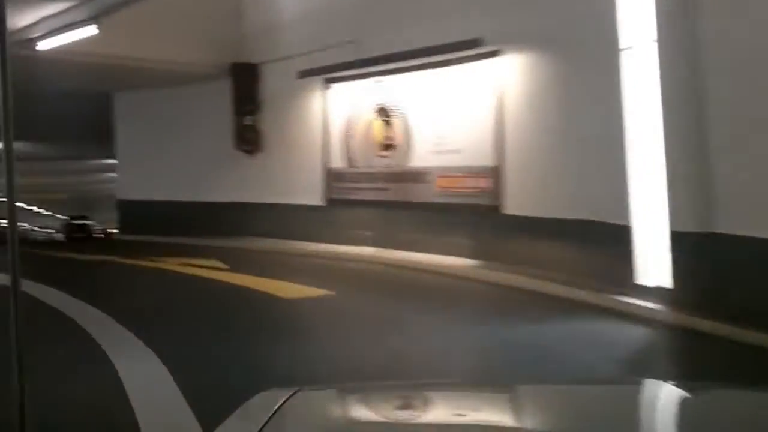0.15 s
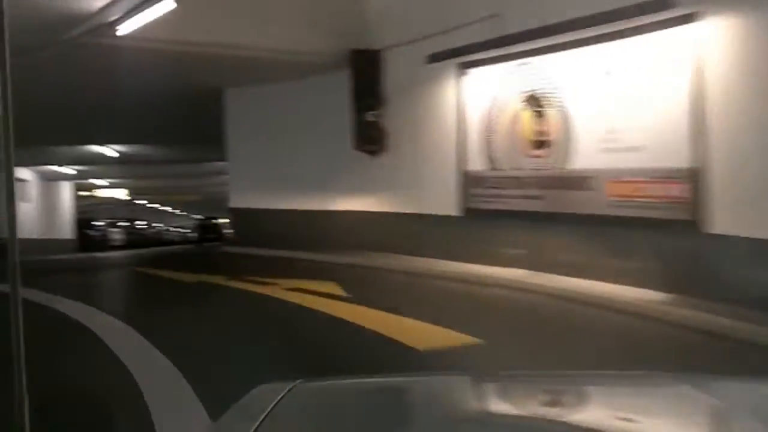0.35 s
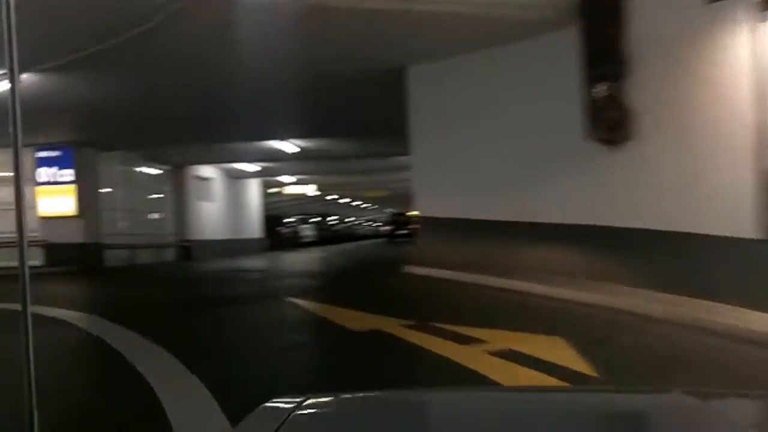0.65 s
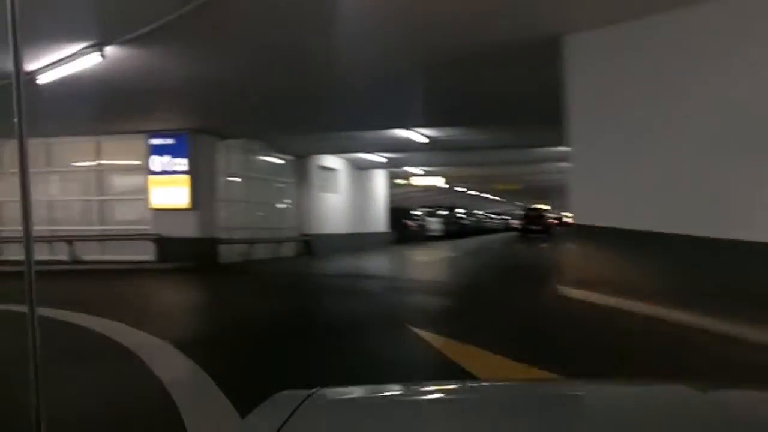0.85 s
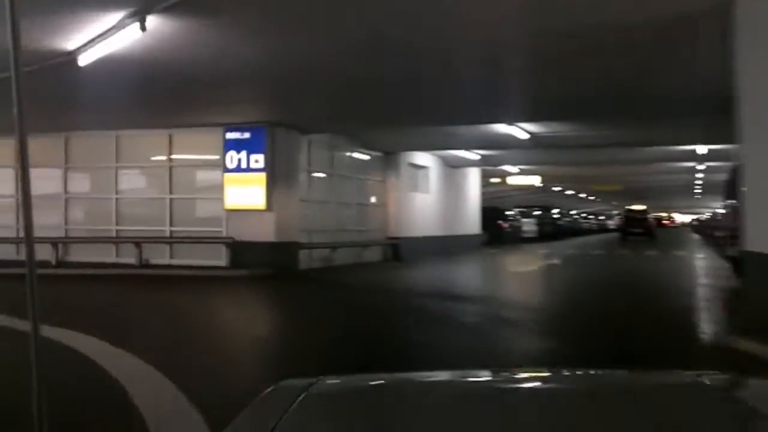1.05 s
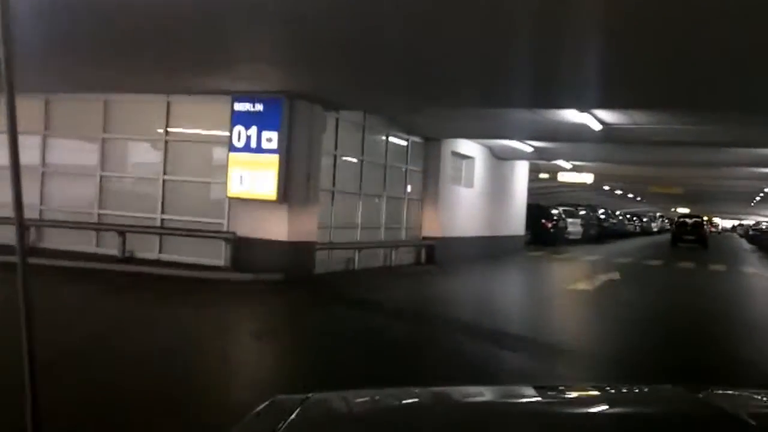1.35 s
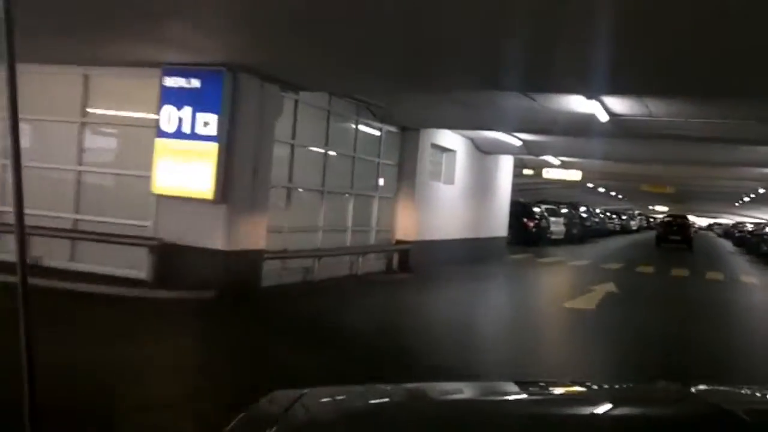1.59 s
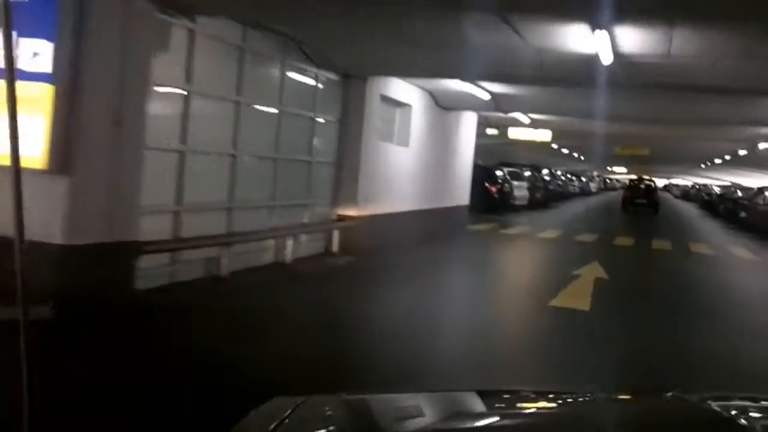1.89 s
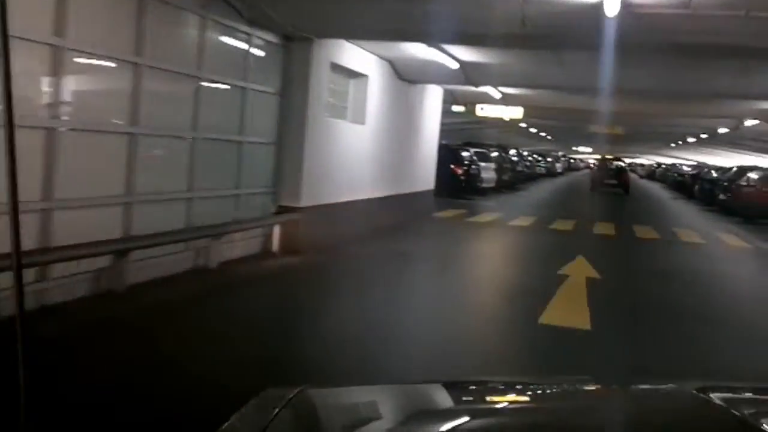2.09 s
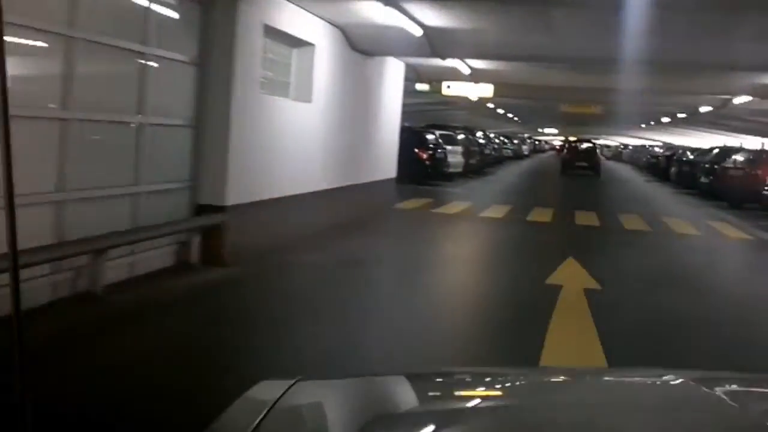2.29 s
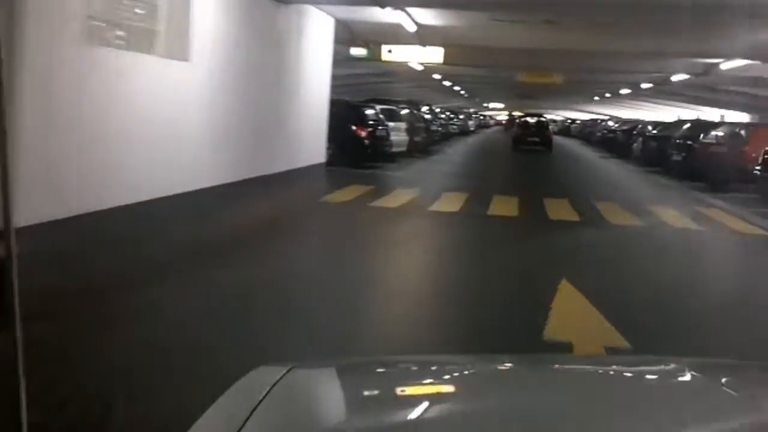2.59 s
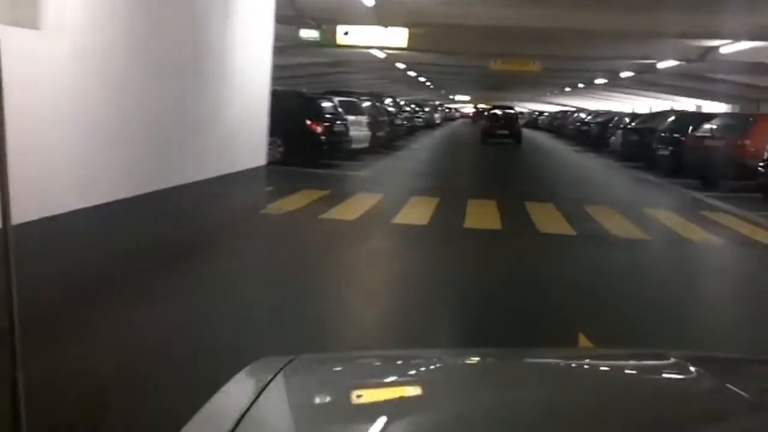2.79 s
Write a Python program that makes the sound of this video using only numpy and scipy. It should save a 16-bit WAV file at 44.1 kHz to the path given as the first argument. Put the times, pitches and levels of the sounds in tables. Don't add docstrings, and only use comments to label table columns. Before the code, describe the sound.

Car tyres squeal in a wavering, high-pitched chatter while turning in a concrete garage; the squeal echoes away and leaves engine hum and thumping rolling rumble, heard from a small camera on board.

```python
import sys
import numpy as np
from scipy import signal
from scipy.fft import rfft, irfft
from scipy.io import wavfile
from scipy.ndimage import uniform_filter1d

SR = 44100
rng = np.random.default_rng(int(sys.argv[2]) if len(sys.argv) > 2 else 0)


def invert_db(x):
    u = np.asarray(x, float) / 20
    return 10 ** u


def pcm_store(signal):
    levels = np.round(np.clip(np.atleast_2d(signal), -1, 1) * 32767)
    wavfile.write(sys.argv[1], SR, levels.astype(np.int16).T)


N = 129654
TIME = np.arange(N) / SR

# [multiple, level/dB]
SLIP_HARMONICS = [(1, 3), (2, -14), (3, -25.5), (4, -42.5)]
# [t/s, roar/dB, body boom/dB, cabin boom/dB, deep roar/dB]
ROLLING = [(0, -43.5, -19.5, -52, -14.5), (.3, -41.5, -30, -50.5, 2.5), (.45, -45, -25, -50.5, -3),
           (.56, -44, -31.5, -30, 2.5), (.75, -46.5, -24.5, -40.5, -0.5), (.95, -43, -26.5, -42.5, -8),
           (1.1, -39, -28, -32.5, 1.5), (1.25, -40.5, -29, -26.5, 2), (1.4, -40.5, -25, -28, 0.5),
           (1.7, -48, -31.5, -26.5, 2), (1.9, -39.5, -51, -19.5, 3.5), (2.1, -44.5, -24.5, -30, 0),
           (2.3, -39.5, -33, -26.5, 3.5), (2.45, -35, -23.5, -31, 2), (2.6, -42, -26, -31.5, -9.5),
           (2.75, -35.5, -25, -50, 5.5), (2.86, -32.5, -27, -47, -6.5), (2.94, -38.5, -25.5, -45, -2.5)]
# [t/s, overload of the gain control/dB, push of the body/-1..1]
BODY_JOLTS = [(.01, 8.5, -0.15), (0.157, 6, -0.14), (0.207, 7, 0.13), (0.353, 7.5, -0.18),
              (0.446, 6.5, 0.19), (0.584, 4, -0.048), (0.639, 5, -0.13), (0.727, -1.5, -0.075),
              (0.804, 5, -0.12), (0.869, 8.5, -0.15), (1.031, 4.5, -0.092), (1.107, 7, -0.13),
              (1.203, 5, 0.023), (1.33, 8.5, 0.25), (1.36, 10.5, -0.22), (1.49, 2, 0.025),
              (1.566, 4, -0.088), (1.679, 8, -0.082), (1.814, 6.5, 0.17), (1.859, 10, 0.074),
              (1.981, 7.5, -0.26), (2.375, 12, -0.25), (2.481, 8, 0.17), (2.54, 7.5, 0.17),
              (2.698, 5.5, -0.097), (2.75, 8, 0.14), (2.892, 2.5, -.08)]


def read(points, hz):
    f, value = np.transpose(points)
    return np.interp(np.log(hz + 1), np.log(f + 1), value)


def curve(table):
    rows = np.transpose(table)
    return [np.interp(TIME, rows[0], r) for r in rows[1:]]


def evened(x):
    return x / np.sqrt(np.mean(x ** 2) + 1e-20)


def tinted(x, gain):
    hz = np.fft.rfftfreq(x.shape[-1], 1 / SR)
    return irfft(rfft(x) * gain(hz), x.shape[-1])


def noise(gain):
    return evened(tinted(rng.standard_normal(N), gain))


def drift(hz, count=1):
    return evened(tinted(rng.standard_normal((count, N)), lambda f: 1 / (1 + (f / hz) ** 4)))


def phase(hz):
    return 2 * np.pi * np.cumsum(hz, axis=-1) / SR


def ducking_db():
    recover_db_per_s = 90.5
    jolts = np.array(BODY_JOLTS)
    since = TIME - jolts[:, :1]
    over = np.where(since > 0, jolts[:, 1:2] - recover_db_per_s * since, 0)
    return uniform_filter1d(np.maximum(over.max(axis=0), 0), size=180)


def squeal():
    # [t/s, level/dB, slip pitch f/Hz, spread of the ribs/ratio, scuff/dB]
    scrub = [(.03, -35, 1635, 0.31, -50), (.13, -29.5, 1592, 1.35, -57.5), (.28, -27.5, 1583, 1.276, -48.5),
             (.42, -32, 1597, 0.98, -57), (.56, -26.5, 1631, 0.85, -55), (.68, -30.5, 1597, 0.73, -59.5),
             (.84, -35, 1612, 0.94, -54), (.88, -24.5, 1609, 0.86, -46), (.97, -30.5, 1688, .8, -57.5),
             (1.08, -30, 1609, 1.64, -47), (1.16, -33.5, 1608, 1.33, -61.5), (1.3, -39, 1590, 0.98, -55.5),
             (1.4, -40, 1570, 1, -67.5), (1.5, -42, 1570, 1.12, -59.5), (1.65, -51.5, 1585, 0.97, -83),
             (1.81, -47.5, 1567, 1.074, -58.5), (2.1, -64, 1542, 1.26, -69), (2.5, -81, 1536, 1.284, -70)]
    rib_db = [
        [-11],
        [-3],
        [0],
        [0],
        [-3],
        [-11],
    ]
    # [f/Hz, density/dB per Hz]
    scuff_colour = [(1250, -16.5), (1600, 8), (1950, 3), (2300, -15.5), (3000, 3), (3750, -4.5), (4150, -8),
                    (8000, -14)]
    level_db, hz, spread, scuff_db = curve(scrub)
    offset = 0.025 * spread * (np.arange(6)[:, None] - 5 / 2)
    wander = 0.017 * tinted(drift(55, count=6), lambda f: f > 8)
    turns = phase(hz * (1 + offset + wander))
    grip_db = 4 * tinted(drift(45, count=6), lambda f: f > 5)
    grip = invert_db(grip_db + rib_db)
    ribs = np.zeros(N)
    for k, db in SLIP_HARMONICS:
        edge_db = 5.5 * (k > 1)
        ribs += invert_db(db + edge_db) * (grip * np.cos(k * turns)).sum(axis=0)
    grit = noise(lambda f: invert_db(read(scuff_colour, f)) * (f > 900))
    near = bites() + invert_db(level_db - 7) * evened(ribs)
    near = near + invert_db(scuff_db + 8 + 3 * drift(50)[0]) * grit
    return garage(near)


def bites():
    # [t/s, peak level/dB, f/Hz, length/s]
    rib_bites = [(0.0292, -35, 1387, 0.017), (0.0303, -25, 1598, 0.013), (0.055, -35.5, 1653, 0.015),
                 (0.1084, -26.5, 1645, 0.013), (0.1357, -21.5, 1557, 0.016), (0.2217, -28, 1558, 0.014),
                 (0.2364, -18.5, 1572, 0.011), (0.266, -18, 1609, 0.013), (0.3113, -18.5, 1590, 0.014),
                 (0.3661, -28.5, 1507, 0.011), (0.3994, -24.5, 1595, 0.011), (0.41, -27.5, 1653, 0.016),
                 (0.4325, -28, 1598, 0.011), (0.463, -31, 1685, 0.012), (0.5215, -23, 1554, 0.013),
                 (0.5312, -20, 1660, 0.011), (0.615, -22.5, 1647, 0.013), (0.6297, -20, 1575, 0.017),
                 (0.6677, -21, 1610, 0.011), (0.681, -17.5, 1561, 0.012), (0.7458, -26, 1627, 0.015),
                 (0.78, -18, 1587, 0.013), (0.854, -22.5, 1660, 0.015), (0.8833, -22, 1742, 0.016),
                 (0.902, -23, 1627, 0.011), (0.945, -23, 1667, 0.011), (0.9577, -20, 1669, 0.015),
                 (0.9914, -29, 1643, 0.013), (1.0265, -27.5, 1645, 0.016), (1.062, -25.5, 1660, 0.013),
                 (1.093, -21, 1674, 0.013), (1.1285, -24, 1511, 0.017), (1.1484, -25, 1620, 0.015),
                 (1.1802, -25, 1640, 0.014), (1.2787, -31, 1568, 0.021), (1.296, -26, 1592, 0.015)]
    out = np.zeros(N)
    for s, peak_db, hz, length in rib_bites:
        t = np.arange(round(max(length, .004) * SR)) / SR
        swell = np.sin(np.pi * (t / t[-1]) ** 0.46)
        tone = sum(invert_db(db) * np.cos(2 * np.pi * k * hz * t) for k, db in SLIP_HARMONICS)
        out[round(s * SR):][:len(t)] += invert_db(peak_db - 6.5) * swell * tone
    return out * invert_db(.5 * ducking_db())


def garage(near):
    t60_s, level_db = 0.96, 0.5
    tail = rng.standard_normal(SR) * invert_db(-60 * np.arange(SR) / SR / t60_s)
    tail = tail / np.linalg.norm(tail)
    return near + invert_db(level_db) * signal.fftconvolve(near, tail)[:N]


def outer():
    # [t/s, level/dB, upper slip tone f/Hz]
    chirps = [
        (0, -56.5, 3508),
        (.12, -46.5, 3310),
        (.3, -40, 3109),
        (.5, -51, 3070),
        (.84, -68, 3320),
        (.93, -50, 3450),
        (1.02, -45.5, 3766),
        (1.09, -44.5, 3590),
        (1.2, -53.5, 3500),
    ]
    level_db, hz = curve(chirps)
    turns = phase(hz * (1 + .035 * drift(90, count=3)))
    rough = invert_db(4.1 * drift(45, count=3))
    tones = rough * (np.cos(turns) + 0.36 * np.cos(turns / 2))
    fade_db = 90 * np.maximum(TIME - chirps[-1][0], 0)
    return invert_db(level_db - fade_db) * evened(tones.sum(axis=0))


def boom():
    # [f/Hz, density/dB per Hz]
    boom_colour = [(8, -3.5), (22, 5), (30, 1), (45, -1.5), (60, -16), (80, -13.5), (130, -15.5)]
    cabin_hz, cabin_width_hz, push_s = 42, 5.6, 0.0053
    _, body_db, cabin_db, _ = curve(ROLLING)
    body = noise(lambda f: invert_db(read(boom_colour, f)) * (f > 6) / (1 + (f / 120) ** 6))
    cabin = noise(lambda f: 1 / (1 + ((f - cabin_hz) / cabin_width_hz) ** 2))
    drum = invert_db(body_db) * 1.75 * np.tanh(body / 1.11)
    drum = drum + invert_db(cabin_db) * 2.33 * np.tanh(cabin / 1.33)
    jolts = np.array(BODY_JOLTS)
    u = (TIME - jolts[:, :1]) / push_s
    push = (jolts[:, 2:] * (1 - 0.27 * u ** 2) * np.exp(-u ** 2 / 2)).sum(axis=0)
    held = 1 - np.minimum(6 * abs(push), 1)
    return (drum * held + push) * invert_db(0.76 * ducking_db())


def roar():
    # [f/Hz, density/dB per Hz]
    roar_colour = [(60, 4.5), (150, -1.5), (300, -11.5), (700, -15), (1900, -22.5), (2550, -25.5),
                   (2900, -29), (5000, -27.5)]
    deep_hz = 298
    level_db, _, _, deep_db = curve(ROLLING)
    hz = np.fft.rfftfreq(512, 1 / SR)
    a, b, patches = rng.standard_normal((N // 128 + 5, 257, 3)).T
    patches = uniform_filter1d(patches, size=8, axis=0)
    patches = evened(uniform_filter1d(patches, size=10, axis=1))
    limits = (hz > 70) / (1 + (hz / 9000) ** 6)
    z = (a + 1j * b) * invert_db(read(roar_colour, hz)[:, None] + 2.06 * patches) * limits[:, None]
    wide = evened(signal.istft(z, nperseg=512, noverlap=384)[1][:N])
    deep = tinted(wide, lambda f: 1 / (1 + (f / deep_hz) ** 2))
    flutter_db = 1.5 * tinted(drift(30)[0], lambda f: f > 8)
    return invert_db(level_db + 8.5 + flutter_db) * (wide + (invert_db(deep_db) - 1) * deep)


def engine():
    # [t/s, firing f/Hz, level/dB]
    firing = [
        (0, 83.5, -36),
        (.4, 80.7, -40),
        (.8, 49.99, -41.5),
        (1.2, 52.26, -30.5),
        (1.45, 70.4, -29.5),
        (1.8, 73.3, -31.5),
        (2.3, 76.58, -31.5),
        (2.7, 77.33, -26.5),
        (2.8, 76.34, -35),
        (2.94, 74.06, -33.5),
    ]
    # [multiple, level/dB, gain at open throttle/dB]
    orders = [(1, -0.5, 3), (2, -12.5, 11.5), (3, -25.5, -16), (4, -23, 15.5), (5, -29.5, 11),
              (6, -39.5, 12)]
    open_s, open_length_s = 2.73, 0.18
    hz, level_db = curve(firing)
    turns = phase(hz * (1 + 0.0263 * drift(8.06)[0]))
    throttle = np.clip((TIME - open_s) / open_length_s, 0, 1)
    waver_db = 1.9 * drift(7.0, count=6)
    tones = np.zeros(N)
    for i, (k, db, more) in enumerate(orders):
        tones += invert_db(db + more * throttle + waver_db[i]) * np.cos(k * turns + i)
    return np.sqrt(2) * invert_db(level_db + 1.01 * ducking_db()) * tones


def flicks():
    # [t/s, level/dB, length/s]
    grit_puffs = [
        (0.846, -37, 0.0056),
        (1.328, -66, 0.0034),
        (2.34, -59, .002),
    ]
    # [t/s, level/dB]
    grit_ticks = [(1.4845, -47), (1.5474, -59), (1.7848, -52), (1.8337, -53), (1.9185, -48), (1.9565, -57),
                  (2.2338, -49), (2.2653, -52), (2.2952, -57), (2.7048, -55)]
    tick_s, tick_db = .004, 11.5
    puffs = sum(invert_db(db) * np.exp(-((TIME - s) / length) ** 4) for s, db, length in grit_puffs)
    for s, db in grit_ticks:
        puffs = puffs + invert_db(db + tick_db) * (TIME > s) * np.exp(-abs(TIME - s) / tick_s)
    return puffs * noise(lambda f: np.clip(f / 6500, 0, 1) ** 2)


def scene():
    return (squeal() + outer() + boom() + roar() + engine() + flicks())[None]


def gain_control(x):
    knee_db, squeeze, release_db_per_s = -17, .4, 86.0
    x = x * invert_db(-ducking_db())
    peak_db = 10 * np.log10(abs(uniform_filter1d(x[0] ** 2, size=200)) + 1e-12)
    fall_db = TIME * release_db_per_s
    held_db = np.maximum.accumulate(peak_db + fall_db) - fall_db
    over_db = np.maximum(held_db - knee_db, 0)
    return x * invert_db(-squeeze * uniform_filter1d(over_db, size=200))


def converter(x):
    # [t/s, level/dB]
    large_swings = [(0.1007, -62), (0.1546, -64), (0.2015, -61), (0.3487, -61), (0.4424, -61),
                    (0.4923, -68), (0.8495, -69), (0.853, -65), (0.8635, -58), (1.3259, -55), (1.3564, -58),
                    (1.4666, -59), (1.5215, -60), (1.5574, -62), (1.5858, -61), (1.6203, -59),
                    (1.6562, -62), (1.6826, -61), (1.7235, -60), (1.8098, -56), (1.8363, -58),
                    (1.8827, -60), (1.969, -57), (2.1082, -60), (2.1406, -62), (2.174, -59), (2.2673, -58),
                    (2.2937, -61), (2.3411, -58), (2.3721, -58), (2.4748, -56), (2.4928, -60),
                    (2.5267, -60), (2.5871, -63), (2.6913, -59), (2.7442, -60)]
    # [f/Hz, level/dB]
    ghost_tones = [(4790, 16), (9580, 29), (11990, 29), (14385, 29)]
    swing_db, swing_s, lag_s = -11, .0024, .0025
    swing = np.zeros(N)
    for s, db in large_swings:
        swing += invert_db(db + swing_db) * np.exp(-((TIME - s - lag_s) / swing_s) ** 2)
    ghosts = sum(invert_db(db) * np.cos(2 * np.pi * hz * TIME) for hz, db in ghost_tones)
    hiss = noise(lambda f: f > 8000)
    hiss_level = invert_db(20) * swing + invert_db(-55 - ducking_db() + 3 * drift(25)[0])
    return x + swing * ghosts + hiss * hiss_level


def microphone(x):
    # [f/Hz, width/Hz]
    hollows = [(2702, 342), (5490, 1035), (7800, 880), (10930, 250)]
    # [f/Hz, level/dB]
    mic_colour = [(4950, 0.5), (5050, -2.5), (6500, -11.5), (7300, -19.5), (8200, -25.5), (9500, -25),
                  (14500, -23), (15100, -37)]

    def response(f):
        notches = [abs(f - hz) / np.hypot(f - hz, width) for hz, width in hollows]
        return invert_db(read(mic_colour, f)) * np.prod(notches, axis=0)

    return tinted(x, response)


def low_pass(x):
    return signal.sosfilt(signal.butter(12, 15130, fs=SR, output="sos"), x)


def record(dry):
    mix = microphone(converter(gain_control(dry)))
    return low_pass(mix)


dry = scene()
out = record(dry)
pcm_store(out)
```